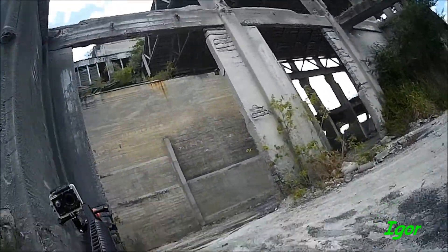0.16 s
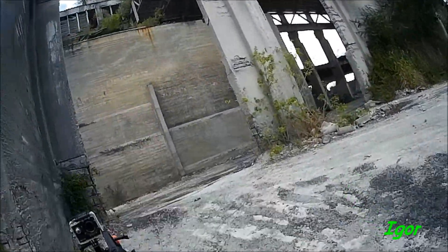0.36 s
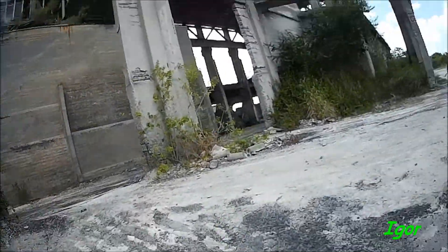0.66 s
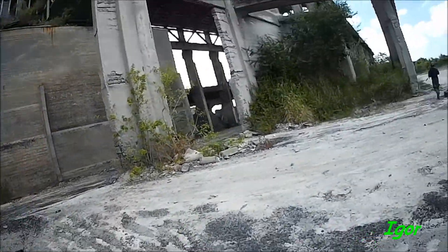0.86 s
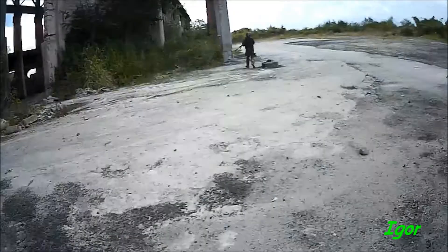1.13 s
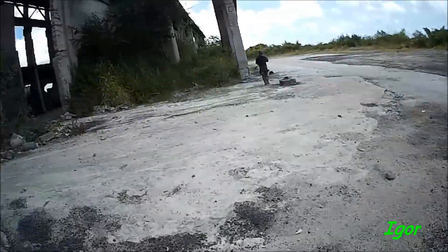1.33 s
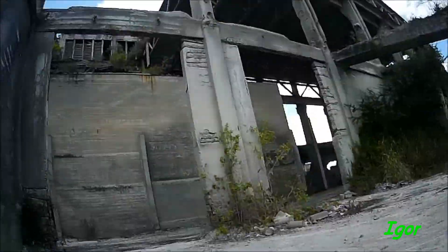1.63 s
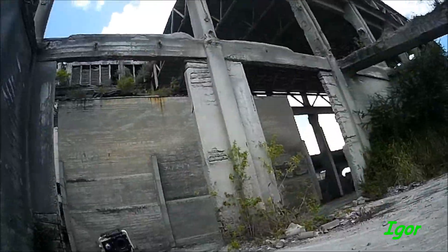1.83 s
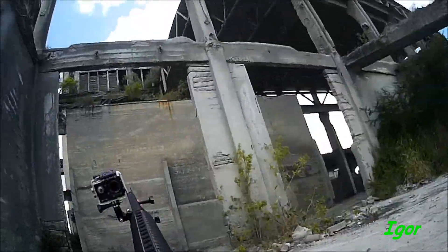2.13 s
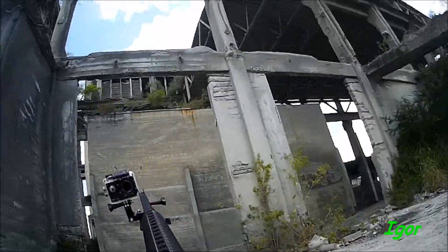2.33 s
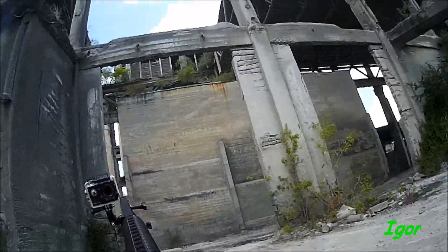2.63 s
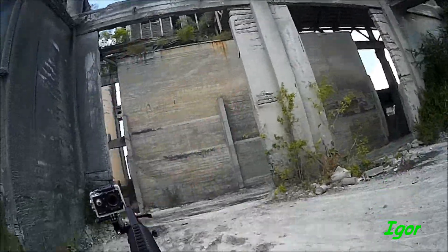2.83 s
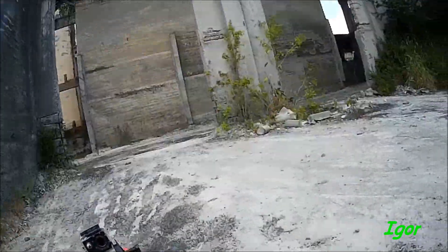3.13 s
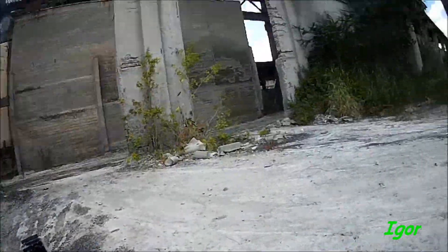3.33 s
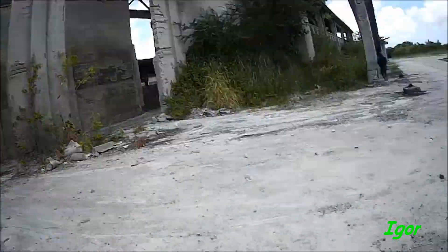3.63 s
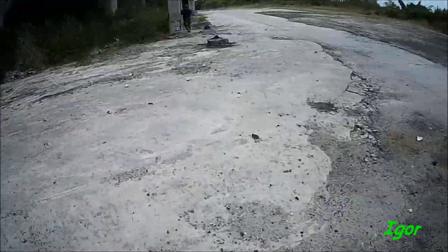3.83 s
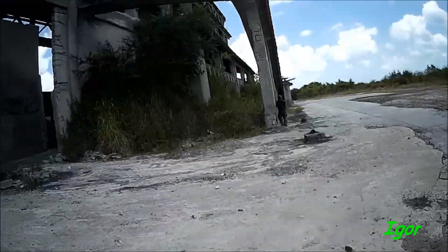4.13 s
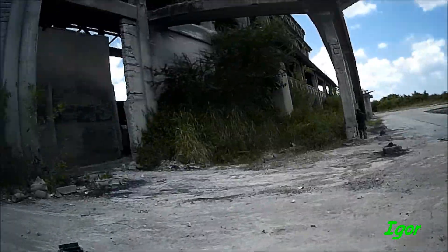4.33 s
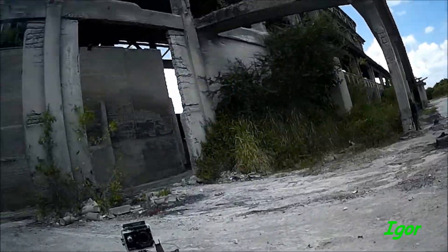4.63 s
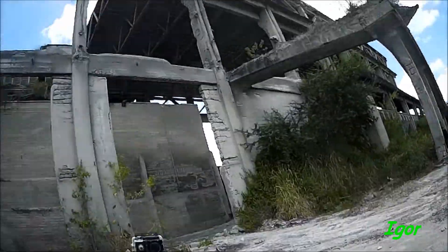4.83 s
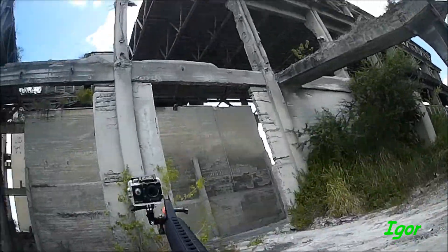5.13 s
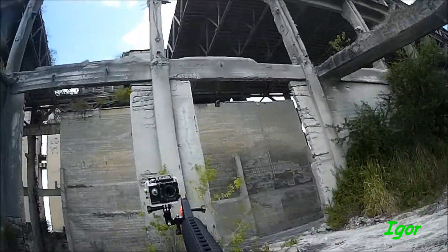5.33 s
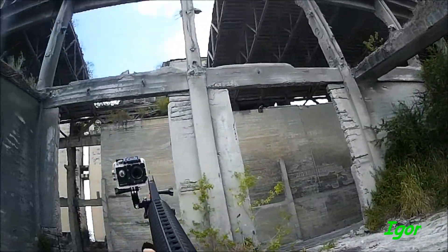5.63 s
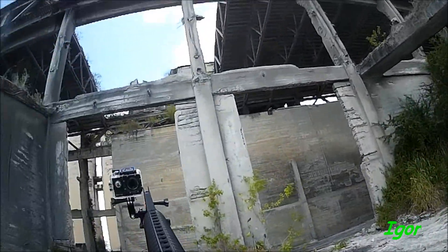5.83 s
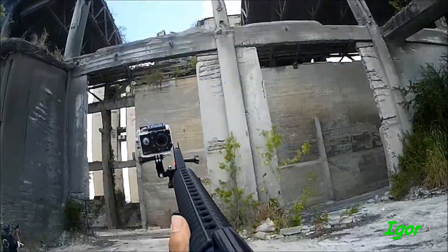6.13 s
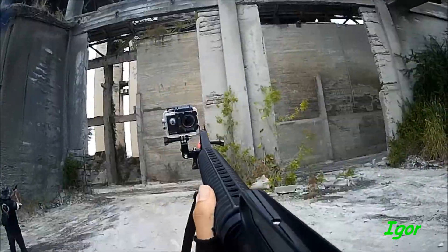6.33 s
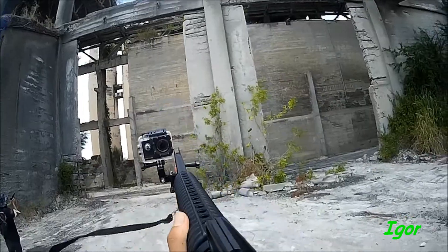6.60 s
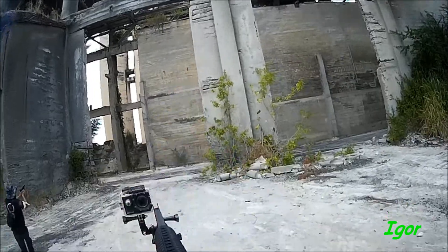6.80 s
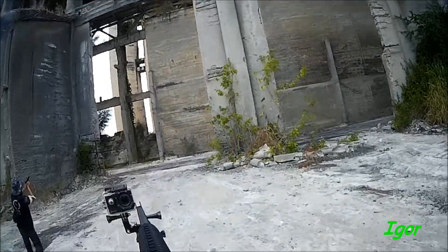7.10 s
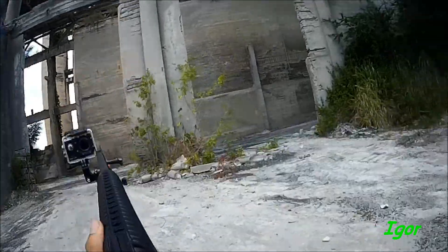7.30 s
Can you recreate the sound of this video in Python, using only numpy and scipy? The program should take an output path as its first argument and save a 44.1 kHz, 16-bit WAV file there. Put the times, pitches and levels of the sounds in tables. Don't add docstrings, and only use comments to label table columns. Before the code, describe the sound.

Heavy, uneven footsteps thud and clack through a head-worn camera case, with plastic knocks and strap rubs over a dull outdoor hum.

```python
import sys
import numpy as np
from scipy import signal
from scipy.io import wavfile

SR = 44100
rng = np.random.default_rng(int(sys.argv[2]) if len(sys.argv) > 2 else 0)


def invert_db(x):
    u = np.asarray(x, float) / 20
    return 10 ** u


def wrap_up_sound(samples):
    columns = np.atleast_2d(samples).T
    tamed = np.clip(columns, -1, 1)
    steps = np.round(tamed * 32767).astype(np.int16)
    wavfile.write(sys.argv[1], SR, steps)


N = 328986


def at_sample(seconds):
    return np.clip(np.round(np.asarray(seconds) * SR).astype(int), 0, N - 1)


def rms_one(x):
    return x / np.sqrt(np.mean(x ** 2) + 1e-20)


def band(x, low_hz, high_hz):
    return signal.sosfilt(signal.butter(2, [low_hz, high_hz], "band", fs=SR, output="sos"), x)


def soften(x, cut_hz):
    return signal.lfilter(*signal.butter(2, cut_hz, fs=SR), x)


def drift(rate):
    step = 40
    pole = np.exp(-2 * np.pi * rate * step / SR)
    noise = rng.standard_normal(N // step + 2002)
    slow = signal.lfilter([1], [1, -2 * pole, pole ** 2], noise)[2000:]
    return np.interp(np.arange(N) / step, np.arange(len(slow)), rms_one(slow))


def strikes(events):
    s, level_db = np.transpose(events)
    clicks = np.zeros(N)
    clicks[at_sample(s)] = invert_db(level_db)
    return clicks


def ring(clicks, hz, t60):
    decay = invert_db(-60 / (t60 * SR))
    turn = 2 * np.pi * hz / SR
    return signal.lfilter([0, np.sin(turn)], [1, -2 * decay * np.cos(turn), decay ** 2], clicks + 1e-18)


def resonate(force, modes):
    t60_width = np.log(1000) / np.pi
    out = 0
    for k, (hz, width_hz, level_db) in enumerate(modes):
        out = out + (-1) ** k * invert_db(level_db) * ring(force, hz, t60_width / width_hz)
    return out


# frequency in Hz, density in dB per Hz
AIR_SPECTRUM = [(35, -36), (60, -3), (305, -7), (3120, -29.5), (14100, -33), (15500, -32.5)]
AIR_DB = -61.5
HUM_SWELL_DB, HUM_SWELL_RATE_HZ = -0.5, 4.3


def air():
    hz_points, db_points = np.transpose(AIR_SPECTRUM)
    white = rng.standard_normal((2, N))
    edges = 50 * 2 ** np.arange(0, 8.6, .5)
    swell_db = HUM_SWELL_DB * drift(HUM_SWELL_RATE_HZ)
    together = drift(3.5)
    out = 0
    for k, (low, high) in enumerate(zip(edges, edges[1:])):
        hz = np.sqrt(low * high)
        outdoor = 1 / (1 + (hz / 3000) ** 2)
        level_db = np.interp(np.log(hz), np.log(hz_points), db_points) + outdoor * swell_db
        flicker_db = (0.086 + .5 * outdoor) * together + (0.22 + 1.2 * outdoor) * drift(16.7)
        out = out + invert_db(level_db + flicker_db) * band(white[k % 2], low, high)
    return invert_db(AIR_DB) * rms_one(out)


# time in seconds, level in dB
SWAY_LEVEL = [(0, -58), (1, -58), (2, -56.5), (3, -64), (4, -60), (5, -66.5), (6, -56), (7.46, -66.5)]


def sway():
    s, level_db = np.transpose(SWAY_LEVEL)
    lumps = rms_one(band(rng.standard_normal(N), 12, 39)) * invert_db(3 * drift(5))
    return invert_db(np.interp(np.arange(N) / SR, s, level_db)) * lumps


# time in seconds, peak in dB
STONE_CRACK = [
    (3.6542, -21),
]


def crack():
    (s, level_db), = STONE_CRACK
    splits = strikes([(s - .0004, -11), (s, 0), (s + 0.00095, -9), (s + 0.00227, -13)])
    broad = band(splits, 620, 5600) * invert_db(24) + ring(splits, 2050, 0.01)
    snap = soften(soften(broad, 4800), 4600)
    return invert_db(level_db) * snap / np.max(np.abs(snap))


# start in seconds, length in seconds, level in dB, bright part in dB
RUBBINGS = [(.6, 0.018, -50, -10), (0.612, 0.14, -67.5, -6), (1.06, 0.035, -44.5, -7.5),
            (1.105, 0.029, -58.5, 5), (1.14, 0.051, -49, -3.5), (1.205, 0.038, -55, 1),
            (1.557, 0.024, -49, -9), (1.577, 0.055, -59, 1), (1.837, 0.011, -59, -15),
            (2.012, 0.019, -48, 0), (2.046, 0.034, -53, -2), (2.086, 0.042, -47.5, -5),
            (3.083, 0.012, -57, -10), (3.618, 0.025, -54, -20), (3.644, 0.022, -46.5, -11),
            (3.688, 0.012, -60, -6), (3.863, 0.028, -60.5, 1), (4.737, .014, -64, 0),
            (4.198, 0.015, -46.5, -8), (4.207, 0.014, -51.5, -16), (4.232, 0.033, -62, 1),
            (4.683, 0.0058, -52, -9), (5.164, 0.0063, -45, -23), (5.182, 0.033, -54, -2),
            (5.22, 0.034, -54.5, -3.5), (6.203, 0.05, -56, -8), (6.252, 0.023, -45, -12.5),
            (7.285, 0.0065, -58, -15), (7.344, 0.023, -55, -5)]
# resonance in Hz, width in Hz, level in dB
GRIT_MODES = [(1650, 440, 7), (2180, 330, 5.5), (2920, 620, 4.5), (3710, 560, 1.5), (4500, 580, -6.5),
              (5660, 1700, -4.5)]


def rubs():
    sizes = rng.standard_normal((2, N)) * invert_db(2.2 * np.minimum(rng.exponential(1, N), 4))
    slipping = rng.random((2, N)) < 7000 / SR
    slips = soften(slipping * sizes * invert_db(2.3 * drift(59)) + 1e-18, 6100)
    gain = np.zeros((2, N))
    for s, length, level_db, bright_db in RUBBINGS:
        part = slice(at_sample(s), at_sample(s + abs(length)))
        phase = np.linspace(0, 1, part.stop - part.start)
        swell = np.abs(np.sin(np.pi * phase ** 0.58))
        levels = invert_db(np.array([[level_db], [level_db + bright_db]]))
        gain[:, part] += swell ** np.array([[.55], [.9]]) * levels
    out = 0
    for force, level, modes in zip(slips, gain, [HOLLOW_MODES[1:] + DULL_MODES, GRIT_MODES]):
        out = out + resonate(force * level, modes) / np.std(resonate(force, modes))
    return out


# resonance in Hz, width in Hz, level in dB
FITTING_MODES = [(1370, 23, -4), (2126, 40, -18), (2880, 36, -23)]
# time in seconds, level in dB
FITTING_HITS = [
    (.62, -71),
    (1.07, -72),
    (3.075, -69),
    (4.206, -66),
    (4.7, -63),
    (7.285, -70),
    (7.36, -68),
]
FITTING_T60_S = .5


def fitting():
    fade = invert_db(-60 / (FITTING_T60_S * SR))
    shaking = signal.lfilter([1], [1, -fade], strikes(FITTING_HITS))
    return shaking * rms_one(resonate(rng.standard_normal(N), FITTING_MODES))


# time in seconds, level in dB, bright part in dB, hollow part in dB
LOOSE_TICKS = [(.0527, -57, -1.5, -1), (.5456, -54, -15, -10), (.6389, -53, -9, -14), (.9193, -58.5, -5, 3),
               (1.1058, -33, -16, -3.6), (1.13, -47, -25, 10), (1.2082, -46, -4, 2.5),
               (1.3825, -56, -4, -18), (1.5634, -30, -18, -2), (1.5884, -48, 1, 11.5),
               (1.6087, -49.5, -16, 13.5), (1.8399, -46.5, -4.5, -16), (2.0323, -47.3, -2, -3),
               (2.1439, -38.5, -19, -2.5), (2.5463, -58, -9, 1), (2.5812, -52.5, -8, -1),
               (3.0665, -39, -14, 5), (3.0759, -34, -15, 2.5), (3.6068, -38, -23, 5), (3.865, -62, -1, -15),
               (3.6113, -38.5, -9.5, 3), (5.1134, -51, -16, -22), (5.118, -54, -14, -20),
               (5.6497, -45, -20, 1), (5.6721, -47, -12, -6), (6.183, -38.5, -20, -5),
               (6.1925, -34.5, -12, -4), (6.3621, -53, -13, -12)]
KNOCK_BELOW_DB, KNOCK_DB_PER_MS, TYPICAL_CONTACT_MS = -20, -2, 7.95
KNOCK_BRIGHT_DB, KNOCK_HOLLOW_DB = -21.5, -6.5
KNOCK_LEAD_S, CLAP_LEAD_S = .0001, 0.00127


def knock_rows():
    landed = []
    for s, depth_db, contact_ms in landings():
        level_db = depth_db + KNOCK_BELOW_DB + KNOCK_DB_PER_MS * (contact_ms - TYPICAL_CONTACT_MS)
        landed.append((s - KNOCK_LEAD_S, level_db, KNOCK_BRIGHT_DB, KNOCK_HOLLOW_DB))
    claps = [(s - CLAP_LEAD_S, *clap) for s, _, *clap in MOUNT_REBOUNDS]
    return landed + claps + LOOSE_TICKS


# resonance in Hz, width in Hz, level in dB
HOLLOW_MODES = [(350, 61, -8.5), (532, 104, -0.5)]
# resonance in Hz, width in Hz, level in dB
DULL_MODES = [(876, 247, 0), (1313, 210, 1.5), (1684, 570, -6.5)]
# resonance in Hz, width in Hz, level in dB
BRIGHT_MODES = [(2124, 210, 2), (2664, 64, -13), (2890, 97, -13), (3500, 200, -5), (4000, 1000, -7),
                (5900, 1200, -20)]
CHATTER_S = 0.0035


def knocks():
    s, level_db, bright_db, hollow_db = np.transpose(knock_rows())
    late = np.sort(rng.random((len(s), 5)), axis=1)
    late[:, 0] = 0
    size = rng.choice([-1, 1], late.shape) * invert_db(-13 * late + 1.5 * rng.standard_normal(late.shape))
    size /= np.linalg.norm(size, axis=1, keepdims=True)
    where = at_sample(s[:, None] + .0003 + late * CHATTER_S)
    parts = [(HOLLOW_MODES, hollow_db + 0.6, 900),
             (DULL_MODES, 1.5, 2400),
             (BRIGHT_MODES, bright_db + 0.5, 6000)]
    out = 0
    for modes, part_db, cut_hz in parts:
        force = np.zeros(N)
        np.add.at(force, where, size * invert_db(level_db + part_db)[:, None])
        out = out + resonate(soften(force, cut_hz), modes)
    return out


# time in seconds, ring in dB, clap in dB, bright part in dB, hollow part in dB
MOUNT_REBOUNDS = [(.598, -21, -33, -10, -4), (1.0659, -22, -31, -3.5, 4), (1.1422, -22, -53, -10, -2),
                  (1.844, -46, -65, -10, -7), (2.018, -13, -36.5, 5.5, 3), (3.0709, -16, -41.5, 1.5, 7),
                  (4.2008, -19.5, -32.5, -5, -17), (4.301, -22, -49.5, -14, 10),
                  (4.6947, -18.5, -29.5, -4.5, -41), (5.1575, -20, -37.5, -6.5, -11),
                  (6.263, -22, -50, 0, -9), (6.7192, -20, -37, -5, 8), (7.2777, -23.5, -32, -6, -12),
                  (7.3544, -22, -44, -2, -9)]
# time in seconds, level in dB
STIFF_KICKS = [
    (.815, -40.5),
    (1.568, -59),
    (3.612, -19),
    (3.691, -25),
    (4.056, -36),
    (6.193, -21.5),
    (6.256, -53),
    (7.35, -25),
]
MOUNT_HZ, MOUNT_T60_S = 202, 0.039
KICK_HZ, KICK_T60_S = 184, 0.013


def rebounds():
    springing = ring(strikes([row[:2] for row in MOUNT_REBOUNDS]), MOUNT_HZ, MOUNT_T60_S)
    kicking = ring(strikes(STIFF_KICKS), KICK_HZ, KICK_T60_S)
    return soften(springing + kicking, 850)


# time in seconds, depth in dB, contact in ms, bounce delay in ms, bounce in dB
HEEL_LANDINGS = [(0.5859, -20.5, 15, 24.4, -29.5), (1.0636, -13, 5.85, 30.7, -22.5),
                 (1.5638, -11.5, 8.3, 41, -29), (2.015, -8.5, 7.6, 24.7, -13), (2.532, -25, 8.7, 54.4, -29),
                 (3.067, -12.5, 8, 24.6, -21.5), (3.6064, -14, 8.8, 19.7, -23),
                 (4.1961, -15.5, 8.8, 23.3, -24), (4.688, -19.5, 10.4, 30.4, -22.5),
                 (5.1521, -14.5, 7.8, 21.2, -19), (6.1825, -15.5, 14.8, 22.4, -20),
                 (6.712, -15, 10.3, 27.5, -26.5), (7.2708, -18.5, 8.5, 23.5, -20.5)]
# time in seconds, depth in dB, contact in ms, bounce delay in ms, bounce in dB
SOLE_SLAPS = [(0.21, -30.5, 11, 40.6, -30.5), (1.137, -18.5, 5.5, 36, -25), (1.192, -23, 7.9, 14.3, -28),
              (2.082, -15.5, 6.1, 40.4, -23), (3.148, -27, 11.2, 18.5, -34), (3.6836, -23.5, 7.2, 26, -33),
              (3.759, -30.5, 9.9, 24.5, -39), (4.288, -23.5, 9.9, 17, -26.5), (5.223, -20, 8.1, 42, -27),
              (6.254, -15.5, 6.5, 35.2, -23.5), (7.3472, -18, 5, 32, -25)]
BOUNCE_MS = 9.23


def landings():
    rows = [*HEEL_LANDINGS, *SOLE_SLAPS]
    bounces = [(s + after_ms / 1000, bounce_db, BOUNCE_MS) for s, _, _, after_ms, bounce_db in rows]
    return [row[:3] for row in rows] + bounces


# start in seconds, depth in dB, contact in ms
FOOT_LOADS = [(0.594, -27, 26), (1.0546, -17, 31.5), (1.546, -12.5, 23), (2.009, -16, 36.6),
              (2.509, -26, 37), (3.06, -19, 29), (3.5865, -17, 26.7), (4.1792, -20.5, 27), (4.686, -21, 26),
              (5.133, -20.5, 40), (5.643, -21, 24.6), (6.6998, -28.5, 19.6), (7.264, -21, 31)]
# start in seconds, depth in dB, contact in ms
PADDING_TAPS = [(0.187, -30.5, 8.5), (.547, -40, 9), (0.7403, -38, 8.7), (1.0805, -19.5, 10.4),
                (1.101, -26, 6.5), (1.117, -23.5, 18), (1.168, -27, 9), (1.217, -28.5, 7.4),
                (1.5287, -37, 15.3), (1.546, -29, 13), (1.8398, -30.5, 5.2), (1.847, -28, 8.9),
                (1.8773, -32.5, 14), (2.0074, -21, 11.5), (2.0454, -16, 10.8), (2.0575, -18, 13),
                (2.141, -28, 5.4), (2.3276, -43, 7.4), (2.5788, -31.5, 7.2), (3.055, -24, 15.8),
                (4.0628, -34, 8), (4.244, -36, 9.3), (4.6148, -30.5, 9.5), (4.746, -32, 13),
                (5.1913, -24, 10.4), (5.2104, -26.5, 5.3), (5.2443, -30, 5.3), (5.671, -23, 7.9),
                (6.332, -26.5, 10), (6.365, -35, 8.9)]
# start in seconds,
# depth in dB, contact in ms
FURTHER_PUSHES = [(.172, -33, 47), (0.2486, -36, 24), (0.299, -37, 28), (.6413, -33.5, 33), (0.694, -34.5, 39),
                  (1.078, -26, 35), (1.1934, -30, 19), (1.5698, -19.5, 32), (1.6289, -37, 27), (1.856, -37, 18),
                  (3.6086, -29, 11.5), (3.6457, -28.5, 19), (3.9805, -33, 24.4), (4.371, -40, 12),
                  (5.1579, -32, 11.7), (5.23, -24, 24), (5.7379, -42, 47), (6.1687, -31, 7.8),
                  (6.2584, -22.5, 26), (7.3497, -28.5, 25), (.5594, -43, 21), (1.596, -29, 6.1),
                  (1.893, -40, 9.9), (2.1142, -34, 5.4), (3.661, -34, 5.8), (3.697, -36, 11), (4.2579, -37, 8.4),
                  (5.2501, -27.5, 4.8), (6.222, -36, 4.5), (6.352, -37.5, 6)]
LEAN_LEAD_S, LEAN_DB, LEAN_MS = 0.0335, -15, 36
SHUDDER_AFTER_S, SHUDDER_DB, SHUDDER_MS = 0.01175, -11, 7.7


def soft_pushes():
    leans = [(s - LEAN_LEAD_S, depth_db + LEAN_DB, LEAN_MS) for s, depth_db, _ in FOOT_LOADS]
    shudders = [(s + SHUDDER_AFTER_S, depth_db + SHUDDER_DB, SHUDDER_MS)
                for s, depth_db, *_ in HEEL_LANDINGS]
    return [*FOOT_LOADS, *leans, *shudders, *PADDING_TAPS, *FURTHER_PUSHES]


def jolts():
    push = np.zeros(N)
    for s, depth_db, contact_ms in landings() + soft_pushes():
        phase = np.linspace(0, 1, round(contact_ms * SR / 1000))
        steepness = np.clip(0.6 + contact_ms / 40, .5, 1)
        shape = np.sin(np.pi * phase ** steepness) ** 2
        start = at_sample(s)
        push[start:start + len(shape)] -= invert_db(depth_db) * shape[:N - start]
    leak = signal.butter(2, 20, "high", fs=SR, output="sos")
    return signal.sosfilt(leak, push)


def scene():
    body_borne = jolts() + rebounds() + knocks() + fitting() + rubs()
    return (body_borne + crack() + air() + sway())[None, :]


def low_pass(x):
    return signal.sosfilt(signal.butter(12, 15710, fs=SR, output="sos"), x)


def record(dry):
    top_cut = signal.cheby2(10, 60, 16600, fs=SR, output="sos")
    mix = signal.sosfilt(top_cut, dry)
    return low_pass(mix)


dry = scene()
out = record(dry)
wrap_up_sound(out)
```